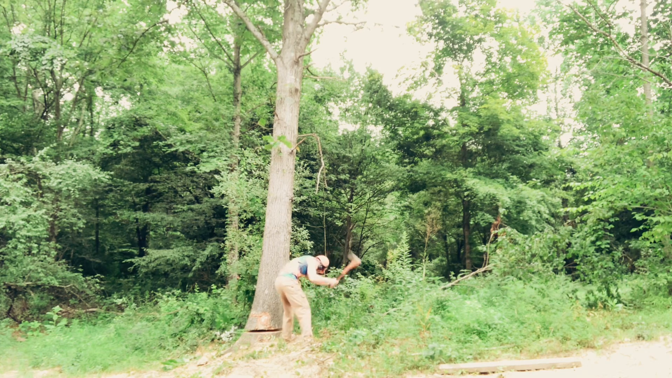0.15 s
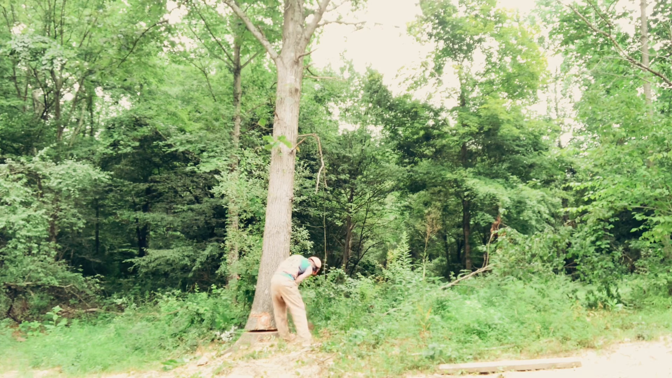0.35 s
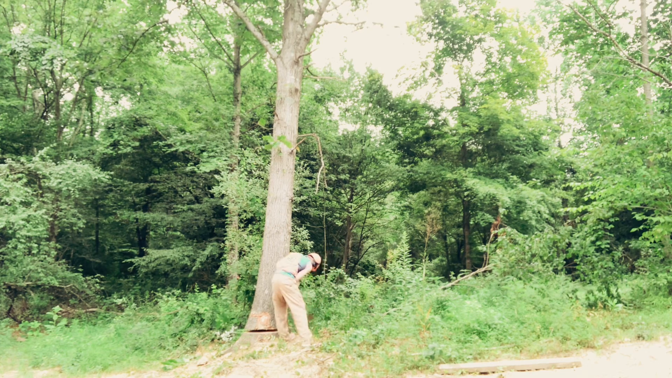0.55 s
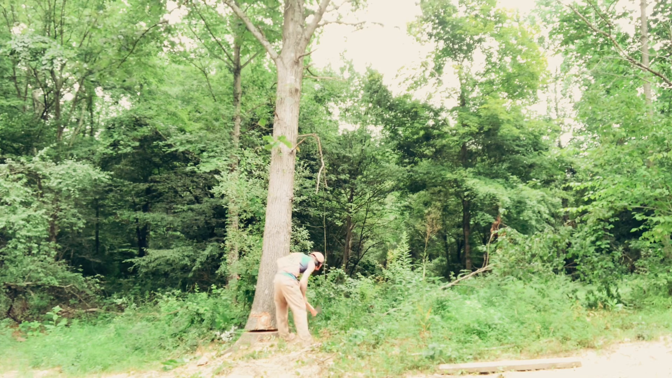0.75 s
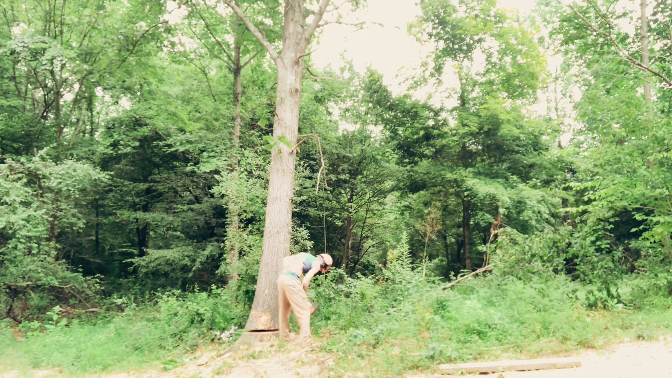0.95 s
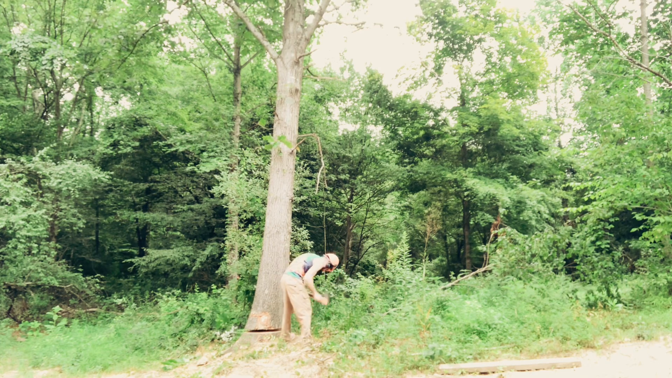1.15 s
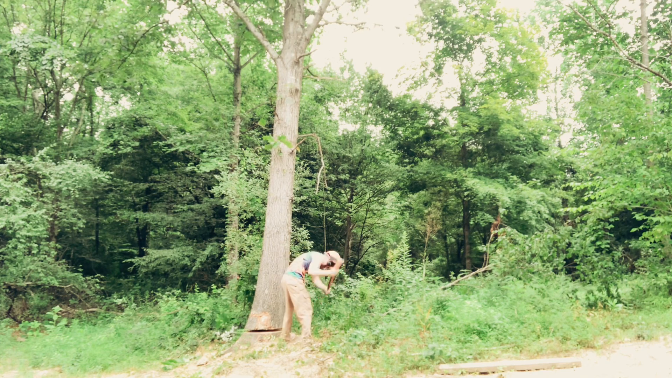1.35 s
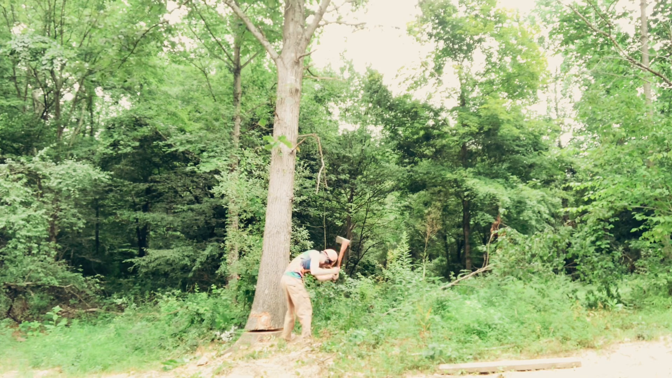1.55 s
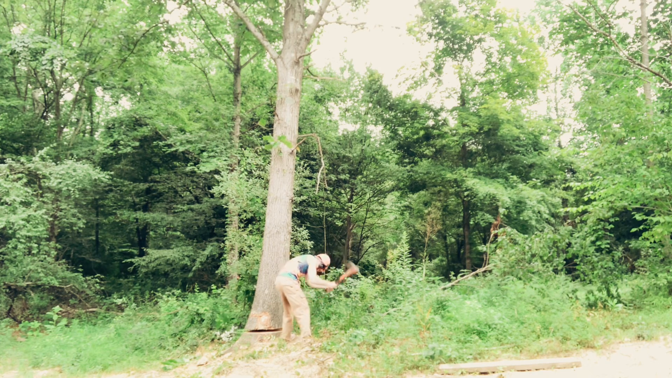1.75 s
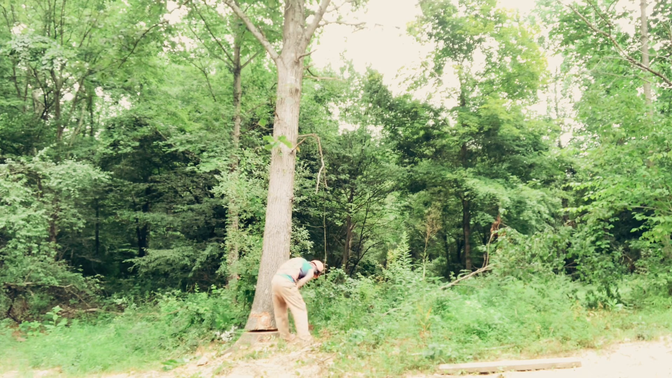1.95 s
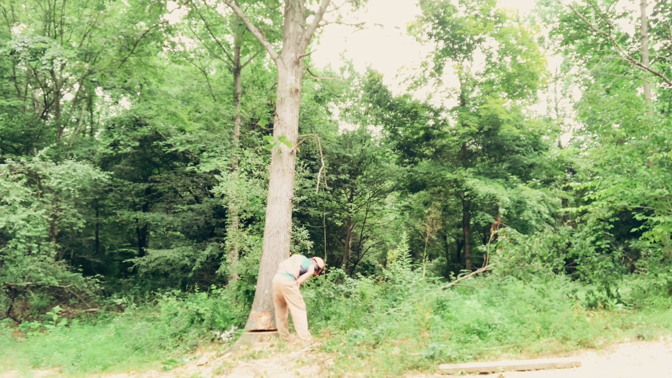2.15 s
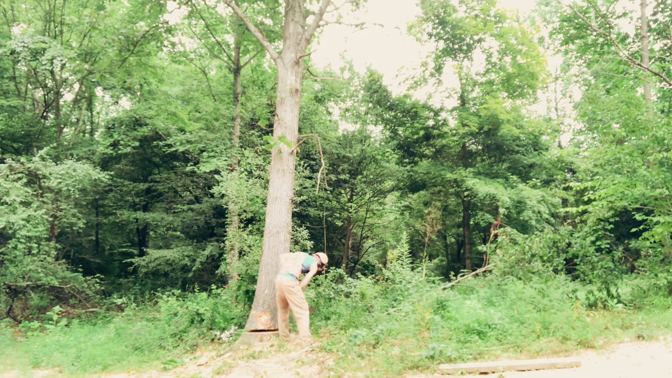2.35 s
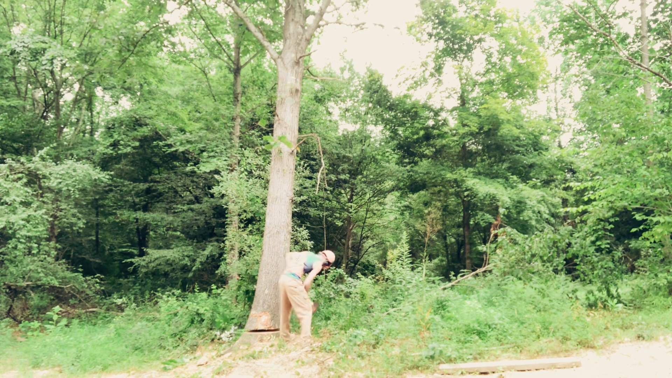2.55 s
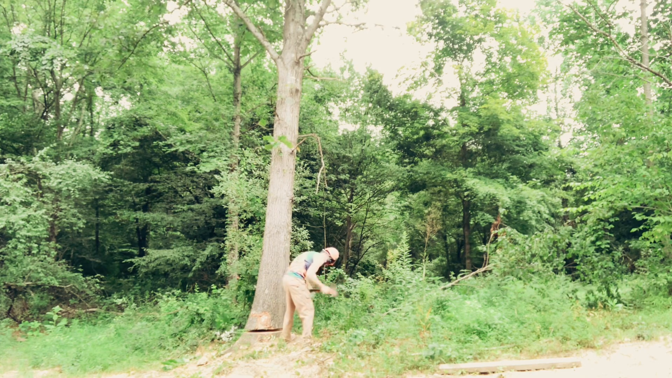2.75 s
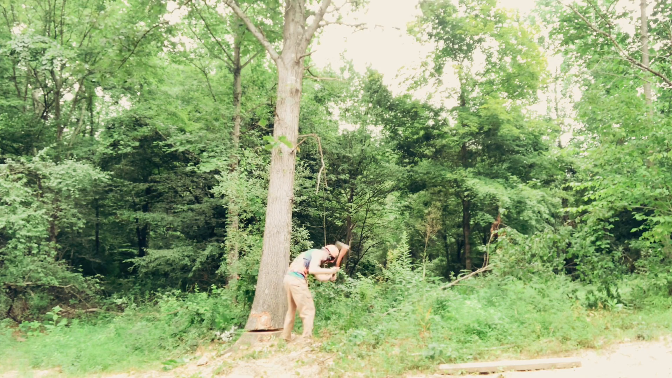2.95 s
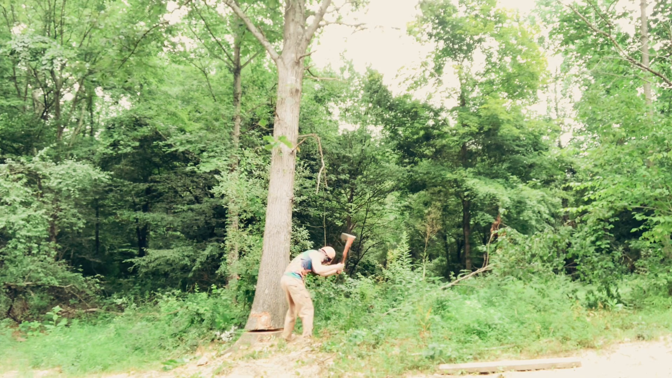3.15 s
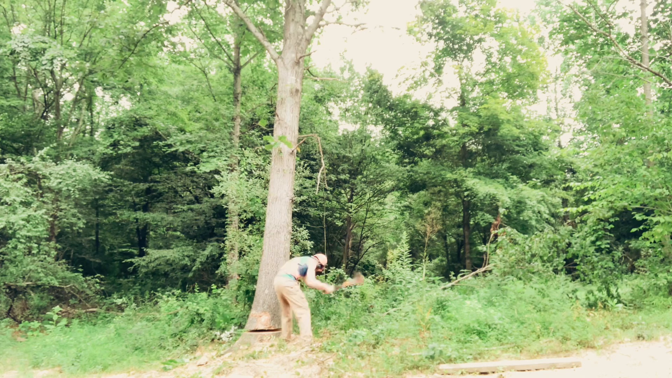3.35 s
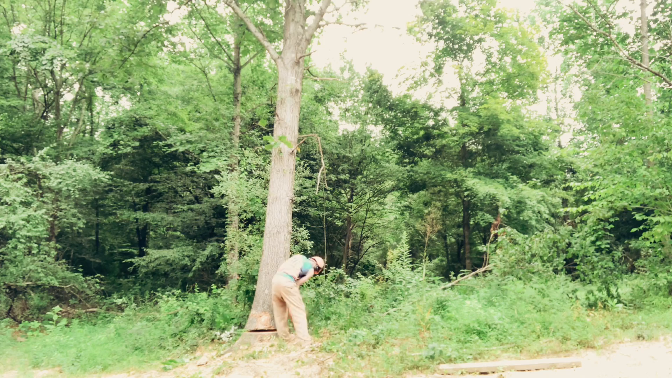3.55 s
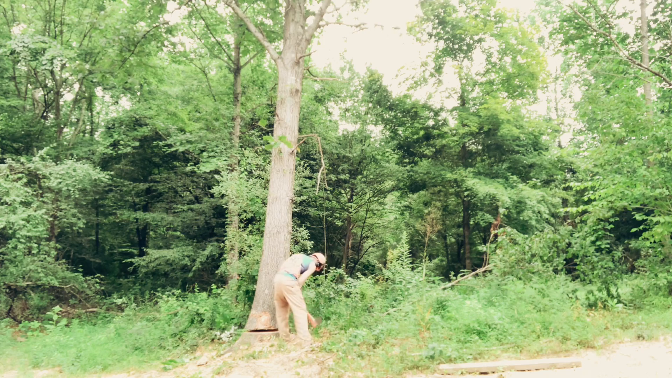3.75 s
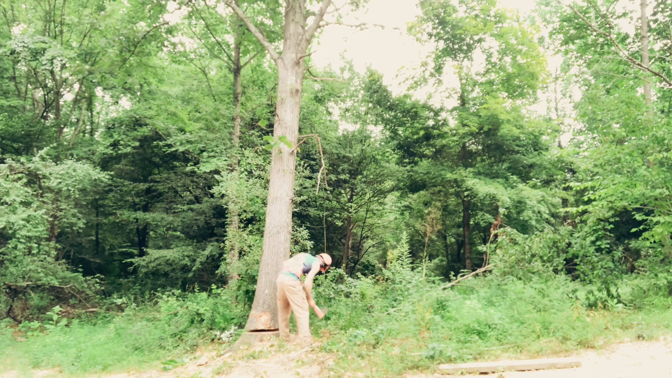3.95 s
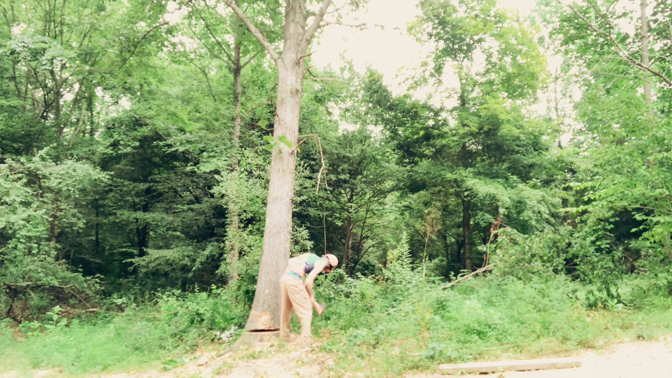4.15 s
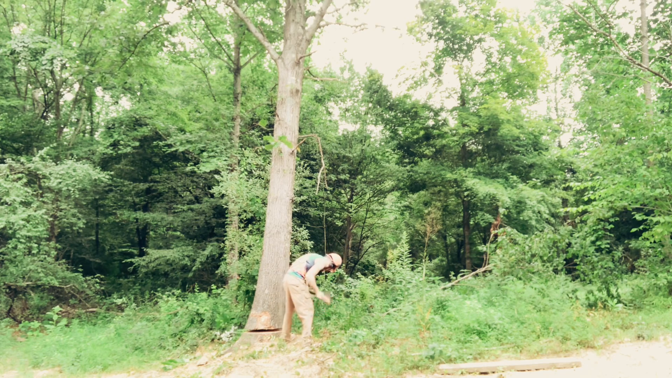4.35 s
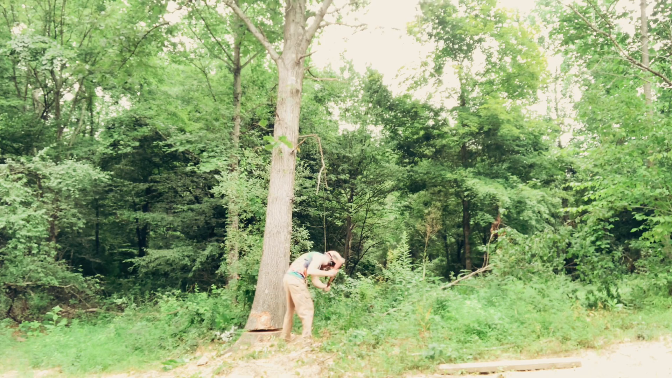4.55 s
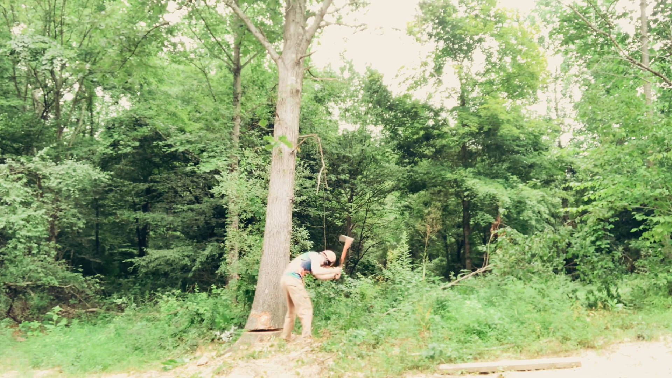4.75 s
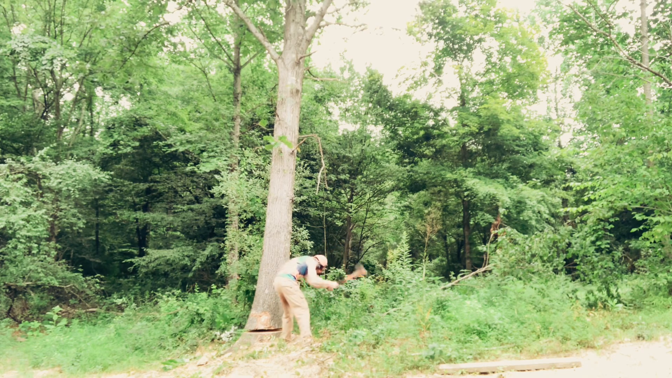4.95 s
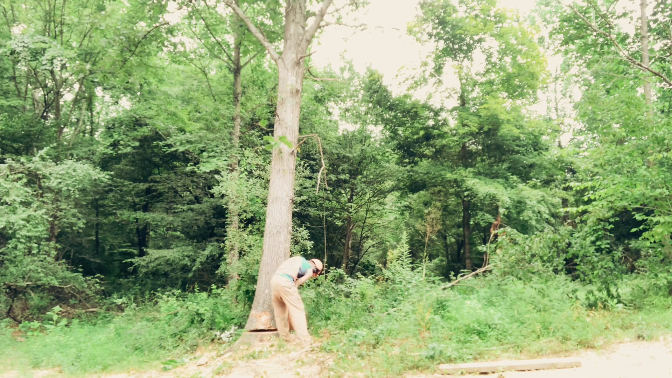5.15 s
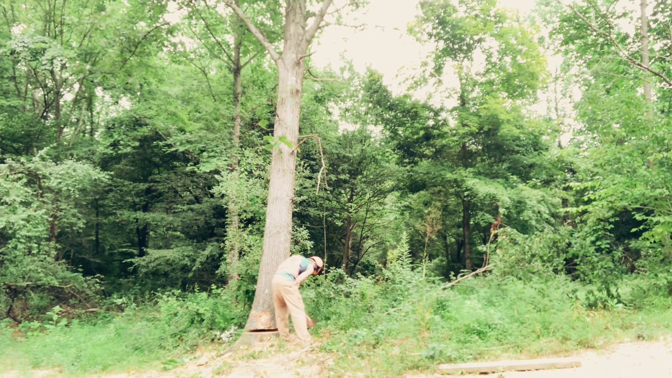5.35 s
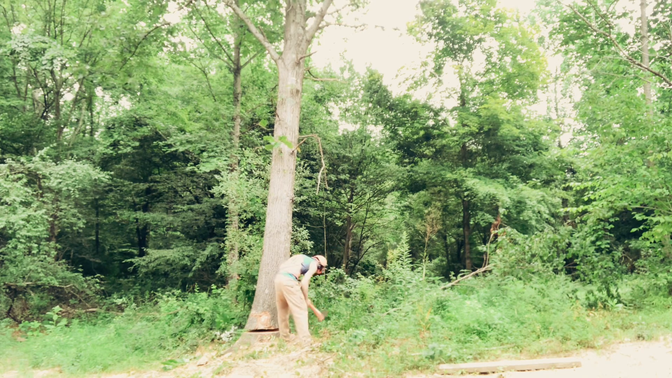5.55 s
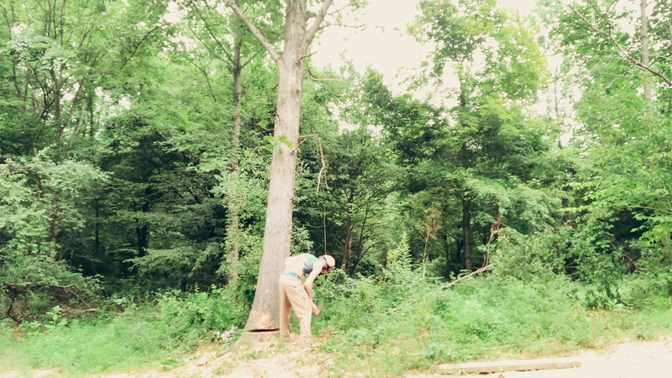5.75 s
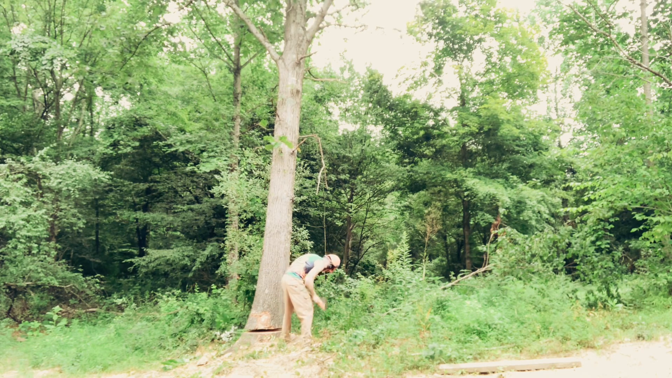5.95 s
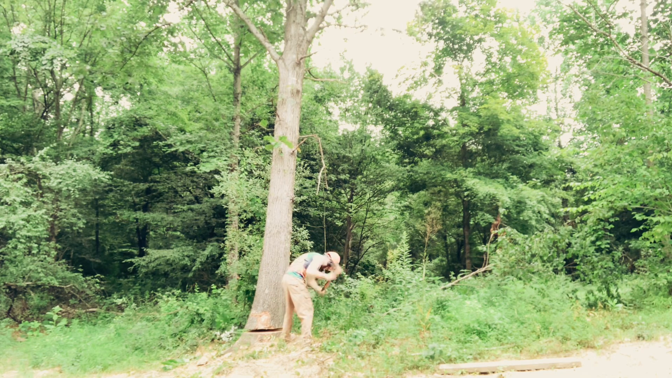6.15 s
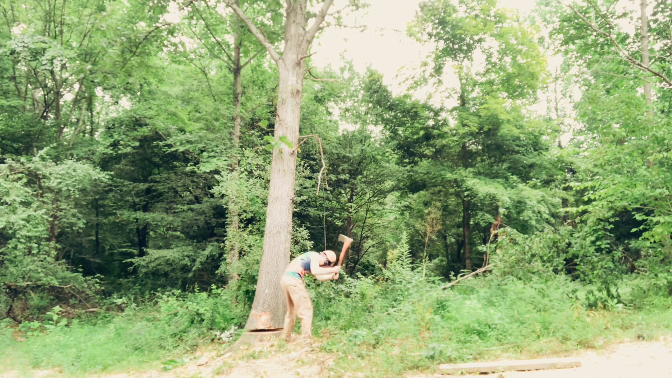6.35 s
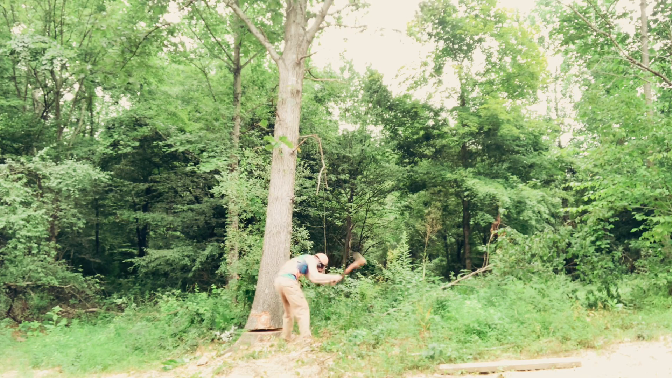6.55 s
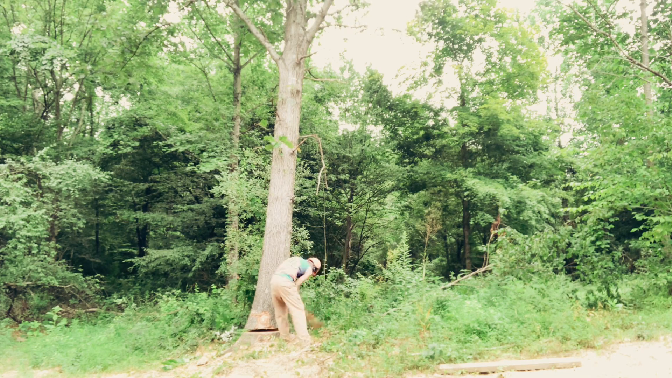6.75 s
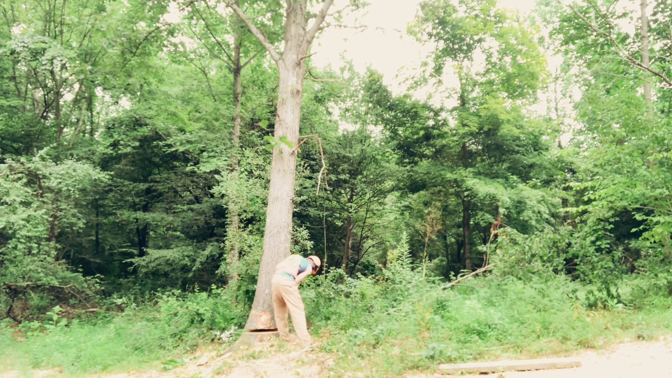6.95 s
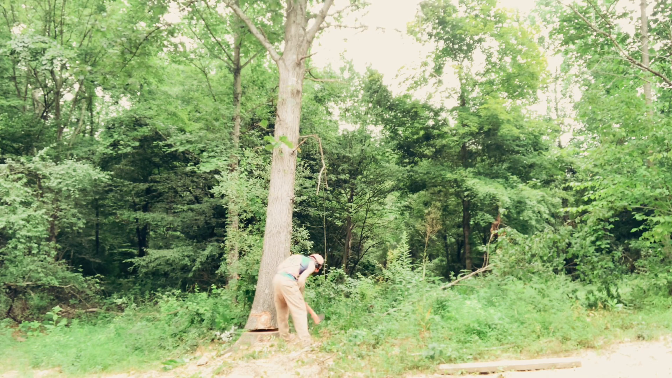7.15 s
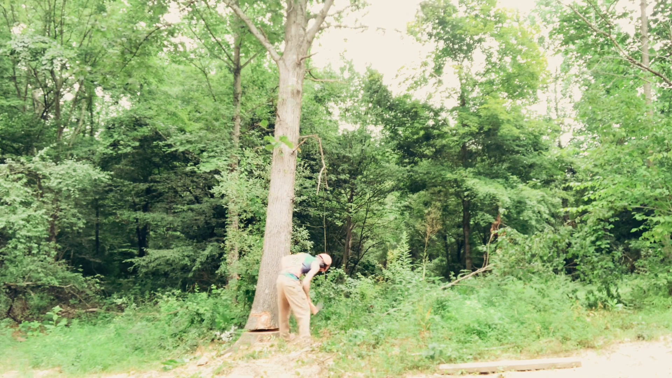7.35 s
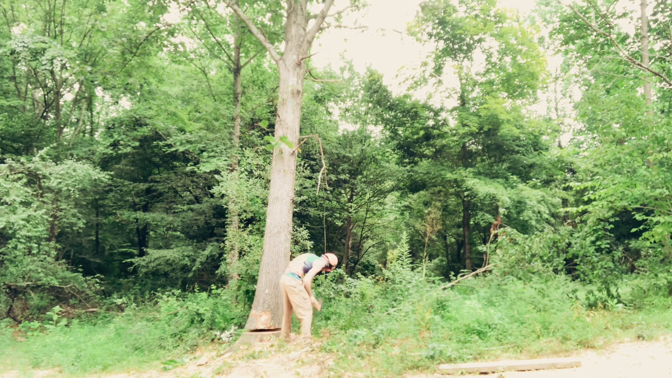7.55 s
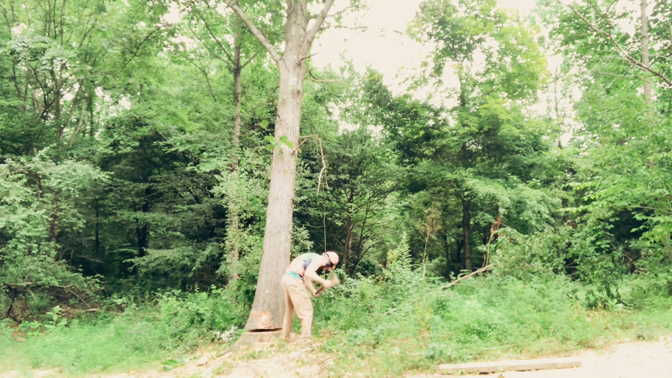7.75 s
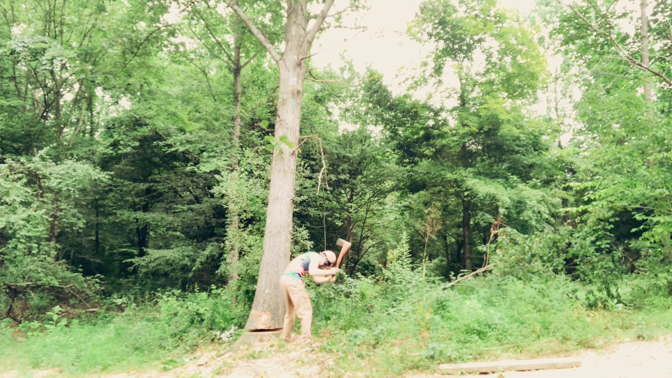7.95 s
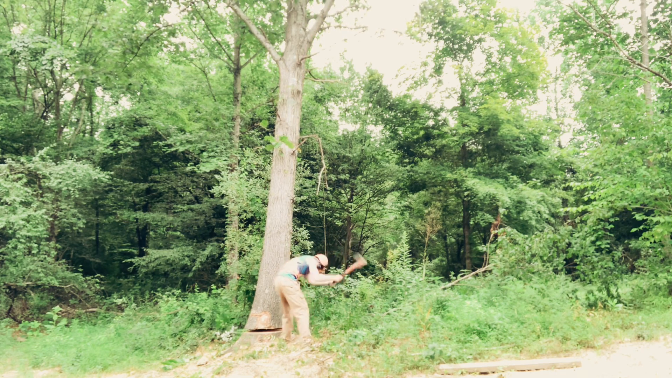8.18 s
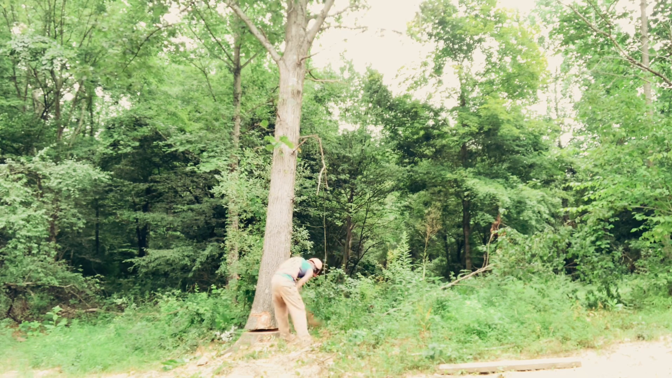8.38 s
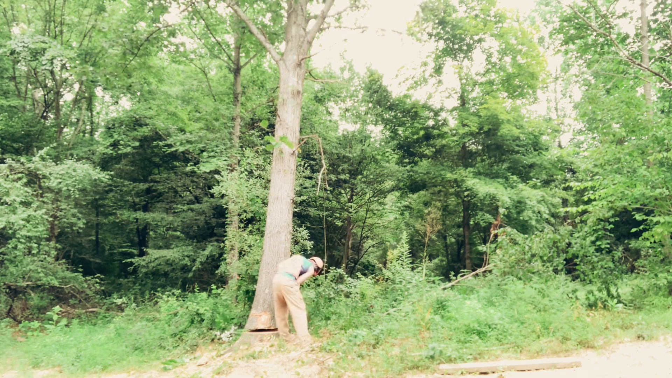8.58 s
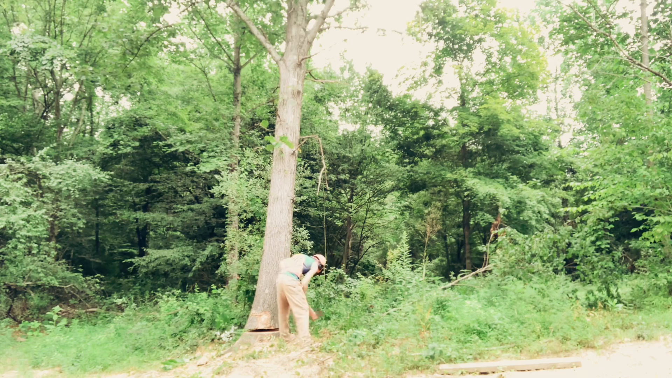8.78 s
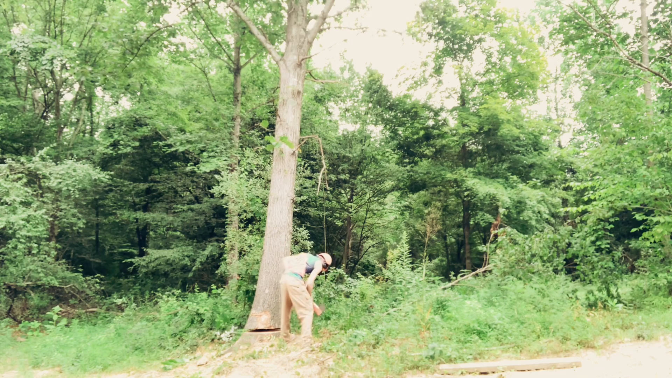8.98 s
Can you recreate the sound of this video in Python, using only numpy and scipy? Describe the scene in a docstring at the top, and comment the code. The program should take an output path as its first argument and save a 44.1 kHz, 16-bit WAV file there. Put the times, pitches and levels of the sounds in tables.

```python
"""Six axe blows, evenly spaced, drive wedges into the cut of a tall tree: each is a burst of noise with a
steel clink, a hollow knock of damped wood modes, and noise echoes that die away in the forest.
Before each blow the grip squeaks, as gliding tones blurred by noise, and the palm hisses on the handle.
Twigs snap and leaves rustle in shaped crackle, a far bird whistles in short sine glides,
and still air hisses over a wavering rumble."""
import sys
import numpy as np
from scipy import signal
from scipy.fft import rfft, irfft, next_fast_len
from scipy.io import wavfile
from scipy.ndimage import uniform_filter1d

SR = 44100
rng = np.random.default_rng(int(sys.argv[2]) if len(sys.argv) > 2 else 0)


def master_out(mix):
    """Clip the mix to full scale and print it as 16-bit PCM to the path in sys.argv[1]."""
    frames = np.transpose(np.atleast_2d(mix))
    ceiling = np.clip(frames, -1, 1)
    pcm = np.round(ceiling * 32767).astype(np.int16)
    wavfile.write(sys.argv[1], SR, pcm)


N = 397774

# Still air, leaves and distant rumble: (frequency [Hz], density [dB per Hz])
AIR_SPECTRUM = [(15, -108), (35, -93), (62, -77.5), (110, -88.5), (200, -91.5), (400, -99), (650, -103),
                (950, -103), (1600, -111), (3000, -119), (6000, -121), (9000, -121), (13000, -125),
                (16000, -140)]
# How alike diffuse sound is on the two sides: (frequency [Hz], likeness [0-1])
STEREO_LIKENESS = [(60, .96), (280, .72), (600, .2), (1100, .1), (2500, .2), (4200, .45), (6200, .4),
                   (8000, .92), (16000, .93)]
# Far bird: (time [s], length [s], level [dB], top pitch [Hz], glide to either side of the middle [share of pitch])
WHISTLES = [(4.977, 0.047, -83, 2370, -.08), (5.086, 0.05, -80, 2620, -0.028), (6.056, .12, -74, 2353, 0),
            (6.235, 0.082, -80, 2380, 0), (6.496, 0.099, -75.5, 2394, 0.0083), (6.63, 0.055, -83, 2326, 0),
            (8.173, 0.072, -75, 1456, -.02)]
# Colour of dry leaves and fibres before any tilt: (frequency [Hz], relative level [dB])
LEAF_SPECTRUM = [(100, -4), (400, 6), (1000, 9), (2000, 4.5), (4000, -0.5), (6000, -2), (9000, 1.5),
                 (13000, -7.5), (16000, -9)]
# Long rustle of leaves and bark after the fifth blow: (time [s], level before STIR_GAIN_DB [dB])
STIR_LEVELS = [(7.161, -67), (7.238, -67), (7.296, -62), (7.394, -71), (7.619, -62), (7.632, -65.5),
               (7.908, -70.5), (7.92, -71)]
# Dry snaps of twigs or wood fibres: (time [s], level [dB], t60 [s], tilt [dB per octave])
SNAPS = [(1.686, -64, 0.11, -1.5), (2.605, -48, 0.44, 3), (4.408, -53.5, 0.044, -1),
         (4.416, -59.5, 0.97, -1), (4.448, -60, 0.91, 0.5), (6.446, -64, 0.34, 0.5),
         (7.136, -53.5, 0.16, 1), (7.446, -63, .1, 7), (7.627, -50, 0.61, 1), (7.683, -55, .08, 2),
         (7.789, -51, 0.024, 0.5), (8.687, -46, 0.51, 0)]
# The hand slides along the handle: (time [s], level of the palm's hiss [dB])
SLIDES = [(.009, -100), (1.558, -65), (3.009, -61), (4.666, -70.5), (6.298, -64), (7.535, -72.5),
          (7.938, -64)]
# The grip sticks and slips on the handle: (time [s], length [s], level [dB], middle pitch [Hz],
# glide [share of pitch], arch [share of pitch], roughness [0-1])
SQUEAKS = [(-.02, .08, -74.5, 4230, 0, 0.02, 0.33), (1.524, 0.044, -63.5, 4350, -0.018, 0, 0.69),
           (1.538, 0.032, -64, 2960, .05, -0.016, 0.45), (1.55, 0.044, -58.5, 4370, .15, 0, 0.39),
           (1.571, 0.057, -59.5, 4330, 0.0027, 0, 0.53), (2.999, 0.026, -63, 3480, -.25, -0.023, 0.49),
           (3.004, 0.044, -53, 4500, -.24, -0.044, 0.23), (3.033, 0.028, -61, 3255, -.1, 0, .45),
           (4.633, 0.051, -56, 5660, -0.009, .14, 0.3), (4.664, .028, -57.5, 3570, -.05, -0.024, 0.63),
           (6.269, 0.045, -67.5, 4160, 0, 0.0045, 0.7), (6.296, 0.048, -56, 3950, -0.32, -.08, 0.71),
           (7.529, 0.042, -64, 3700, -.18, 0, 0.77), (7.925, 0.039, -58, 4270, -0.058, 0.017, .4),
           (7.943, .05, -58, 3690, -0.092, 0, .8)]
# Scatter from the ground and nearest trunks: (frequency [Hz], density [dB per Hz], t60 [s])
NEAR_ECHO = [(25, -68.5, 0.28), (50, -52.5, .2), (101, -50.5, .18), (150, -54.5, 0.27), (200, -53.5, 0.54),
             (320, -46, .3), (610, -51.5, 0.22), (900, -48, 0.33), (1310, -51.5, 0.5), (1550, -53.5, 0.38),
             (1910, -56, .22), (2340, -66, .2), (3000, -71.5, 0.16), (16100, -84, .19)]
# Echo of the forest: (frequency [Hz], density [dB per Hz], t60 [s])
FOREST_ECHO = [(25, -71, 0.73), (55.7, -59, 1.1), (100, -69.5, 1.2), (148, -64.5, 0.74), (193, -71, 1.7),
               (503, -72, 1.25), (710, -69.5, 1.3), (827, -60.5, 1.8), (1000, -65, 1.4), (1200, -64, 1.66),
               (1540, -65.5, 1.35), (2040, -63.5, 1.1), (2406, -59.5, 1.05), (2620, -65.5, .95),
               (3100, -68, .9), (6100, -71, .75), (8900, -69, .61), (12500, -76, 0.49), (16000, -86.5, .4)]
# Damped modes of wedge and trunk:
# (frequency [Hz], relative level [dB], t60 [s], left over right [dB], rise [s])
WOOD_MODES = [(66, -16.5, 0.11, -2, 0.0037), (95, -9, 0.035, -2, 0.005), (127, -15, 0.085, -2, 0.0033),
              (183, -23, 0.1, -1, 0.004), (212, -17, 0.068, -1, 0.003), (257, -31.2, 0.094, -1, 0.0038),
              (320, -24.8, 0.13, 0, 0.0022), (331, -7.0, 0.041, -1, 0.0055),
              (348, -26.4, 0.104, -1, 0.0021), (383, -28, 0.106, -1, 0.0032),
              (491, -21.1, 0.094, 1, 0.0012), (532, -23.4, 0.099, 2, 0.001),
              (567, -25.3, 0.063, -2, 0.0015), (593, -9.5, 0.028, 2, 0.0038),
              (630, -27.8, 0.095, 1, 0.0019), (689, -25.3, 0.134, 6, 0.0044),
              (772, -29.2, 0.307, 2, 0.0072), (811, -11.8, 0.057, 10, 0.0021),
              (841, -21.2, 0.116, 2, 0.0013), (942, -27.7, 0.273, -10, 0.0026),
              (977, -17.4, 0.156, -5, 0.006), (991, -7.3, 0.059, 8, 0.0077), (1024, -14.9, 0.077, 2, 0.001),
              (1064, -25.1, 0.118, 2, 0.0013), (1126, 7.6, 0.011, 6, 0.0016),
              (1127, -36.4, 0.43, -1, 0.0014), (1211, -19.0, 0.087, 4, 0.0016),
              (1251, -26.3, 0.354, 3, 0.0085), (1326, -24.8, 0.258, -1, 0.0174),
              (1399, -19.5, 0.045, 4, 0.0008), (1535, -21.5, 0.064, 1, 0.0005),
              (1635, -32.7, 0.102, 1, 0.0011), (1725, -29.5, 0.065, 1, 0.0013),
              (1930, -12.1, 0.009, 1, 0.0001), (2458, -38.4, 0.26, 0, 0.0021)]
# Bands that a hollow blow lifts or loses: (centre [Hz], half width [Hz], share of the hollowness)
HOLLOW_BANDS = [(670, 130, 1), (900, 110, -0.26), (1380, 90, .7), (2200, 300, -.4)]
# Noise of steel on the wedge: (frequency [Hz], density before the blow's gain [dB per Hz])
CRACK_SPECTRUM = [(200, -69.5), (900, -46.5), (1800, -45), (2700, -49.5), (4400, -52.5), (5500, -52.5),
                  (7000, -59.5), (10000, -46), (12000, -51.5), (15000, -53), (16500, -64)]
# Clink of the axe head: (frequency [Hz], level before the blow's gain [dB], t60 [s])
STEEL_MODES = [(3290, -26, 0.0077), (5680, -14, 0.019), (8200, -19, 0.018), (9930, -16.5, 0.017),
               (12370, -22, 0.011)]
# Each blow lands a little differently: (time [s], gain of knock and echo [dB], gain of crack [dB],
# hollowness [dB], treble of the echo [dB], ring of the axe head in the trees [dB])
BLOWS = [(0.4407, 0.5, 1.5, -1.5, -1.5, -47), (2.0431, -1, -4.5, 2, -5.5, -42.5),
         (3.584, .5, 0, -2, -2.5, -35), (5.1842, .5, 0, -1, -1, -46), (6.826, 1, -5.5, -4.5, -4.5, -63.5),
         (8.4585, -2.5, -8.5, 5.5, -8.5, -68)]

RIGHT_LEAD_S = .000245  # treble reaches the right side this much sooner
RUMBLE_HZ, RUMBLE_DEPTH_DB, RUMBLE_RATE = 150, 2.5, 12  # upper edge, depth, changes per second
TICKS_PER_S, TICK_DB, TICK_S = 45, -1.5, .0012  # single dry fibres within a rustle: rate, level, decay
STIR_GAIN_DB, STIR_TILT, STIR_RISE_S, STIR_T60 = 5.5, -0.34, 0.035, 1  # tilt in dB per octave
SNAP_RISE_S = 0.0017
# Palm and lift tilts are in dB per octave; the lift comes LIFT_LEAD_S before the slide
PALM_RISE_S, PALM_T60, PALM_TILT = 0.01, .42, 1.5
LIFT_LEAD_S, LIFT_DB, LIFT_RISE_S, LIFT_T60, LIFT_TILT = 0.34, -66.5, .1, 0.62, -2.4
SLIP_JITTER = .115  # fast pitch scatter at full roughness, share of the pitch
RUB_DB, RUB_WIDTH_HZ = 0, 1600  # rubbing noise against the tone at full roughness, half width
SQUEAK_T60 = .56  # echo of a squeak, seconds
NEAR_DELAY_S = .006  # first scatter after the blow
BELT_S, BELT_SPREAD_S, BELT_DB = 0.054, 0.014, 2  # swell of echo from the nearest belt of trees
RING_T60 = .6  # ring of the steel among the trees, seconds
KNOCK_DELAY_S, KNOCK_LEAD_S = .0005, .00009  # wood after the crack; head start of the left side
CONTACT_S, CRACK_RISE_S = .0007, .00015  # steel bearing on the wedge; rise of the crack
EDGE_HZ = 16500  # upper band limit


def amp(db):
    """Turns decibels into gain."""
    return 10 ** (np.asarray(db) / 20)


def read(table, hz, axis=1):
    """Reads one column of a table, joined on a log-frequency axis."""
    columns = np.transpose(table)
    return np.interp(np.log(hz + 1), np.log(columns[0] + 1), columns[axis])


def evened(x):
    """Scales to rms 1."""
    return x / np.sqrt(np.mean(x ** 2) + 1e-20)


def add(mix, s, sound):
    """Mixes a stereo sound in at time s, trimming what falls outside."""
    start = round(s * SR)
    sound = sound[:, max(-start, 0):]
    part = mix[:, max(start, 0):][:, :sound.shape[1]]
    part += sound[:, :part.shape[1]]


def colour(x, gain_db):
    """Filters by a function that gives dB for each frequency."""
    size = next_fast_len(x.shape[-1] + 2048)
    gain = amp(gain_db(np.fft.rfftfreq(size, 1 / SR)))
    return irfft(rfft(x, size) * gain, size)[..., :x.shape[-1]]


def wander(size, rate):
    """Smooth random curve of rms 1 that takes a new turn rate times a second."""
    knots = rng.standard_normal(4096)
    return evened(np.interp(np.arange(size) * rate / SR, np.arange(len(knots)), knots))


def noise(spectrum, size, direct=False):
    """Stereo noise of a given density; its treble reaches the right side first."""
    hz = np.fft.rfftfreq(size, 1 / SR)
    left, other = rfft(rng.standard_normal((2, size)))
    same = 1 if direct else read(STEREO_LIKENESS, hz)
    right = same * left + np.sqrt(1 - same ** 2) * other
    right = right * np.exp(2j * np.pi * hz * RIGHT_LEAD_S * (hz > 1600))
    return irfft(np.array([left, right]) * amp(read(spectrum, hz)), size) * np.sqrt(SR / 2)


def trees(sound, wet_db, t60):
    """Adds the scatter of the trunks to a small sound, as a decaying random set of paths."""
    t = np.arange(SR // 2) / SR
    paths = rng.standard_normal((2, len(t))) * amp(-60 * t / t60)
    paths *= amp(wet_db) / np.linalg.norm(paths[0])
    paths[:, 0] += 1  # the direct path
    return signal.fftconvolve(sound, paths, axes=1)


def crackle(size, tilt, grain_db=0.83, clump_db=1.1, pivot_hz=4000):
    """Fine dry crackle of rms 1: uneven leaf noise with scattered fibre ticks, tilted in dB per octave."""
    spectrum = [(hz, level + tilt * np.log2(hz / pivot_hz)) for hz, level in LEAF_SPECTRUM]
    breaks = (rng.random(size) < TICKS_PER_S / SR) * rng.exponential(1, size)
    ticks = amp(TICK_DB) * signal.lfilter([1], [1, -np.exp(-1 / (TICK_S * SR))], breaks)
    unevenness = amp(grain_db * wander(size, 840) + clump_db * wander(size, 54))
    return evened(noise(spectrum, size=size) * (1 + ticks) * unevenness)


def burst(rise, t60, tilt):
    """One second of crackle that rises and dies away."""
    t = np.arange(SR) / SR
    fade = amp(-60 * np.maximum(t - rise, 0) / t60)
    return crackle(SR, tilt) * np.minimum(t / rise, 1) * fade


def air():
    """A thin noise hiss that barely swells, over a wavering rumble."""
    swell = amp(.4 * wander(N, 2))
    still = noise(AIR_SPECTRUM, size=next_fast_len(N))[:, :N]
    rumble = colour(still, lambda hz: -20 * np.log10(1 + (hz / RUMBLE_HZ) ** 4))
    return (still - rumble) * swell + rumble * amp(RUMBLE_DEPTH_DB * wander(N, RUMBLE_RATE))


def bird(arch=0.08, waver=.008):
    """Faint sine whistles, arched, gliding and slightly wavering, from deep in the wood."""
    out = np.zeros((2, N))
    for s, length, db, top_hz, glide in WHISTLES:
        u = np.linspace(-1, 1, int(length * SR))
        pitch = top_hz * (1 - arch * u ** 2 + glide * u + waver * wander(len(u), 400))
        turn = 2 * np.pi * np.cumsum(pitch) / SR
        sides = np.array([np.sin(turn), np.cos(turn)])  # a quarter cycle apart for width
        whistle = amp(db) * evened(sides * (1 - u ** 2))
        add(out, s, trees(whistle, wet_db=-7.5, t60=.35))
    return out


def stir():
    """Leaves and bark keep rustling for a while: crackle that swells and sinks, then dies away."""
    out = np.zeros((2, N))
    times, db = np.transpose(STIR_LEVELS)
    t = np.arange(times[0], times[-1] + STIR_T60, 1 / SR)
    dying_db = -60 * np.maximum(t - times[-1], 0) / STIR_T60
    level_db = STIR_GAIN_DB + np.interp(t, times, db) + dying_db
    fade_in = np.minimum((t - times[0]) / STIR_RISE_S, 1)
    add(out, times[0], fade_in * amp(level_db) * crackle(len(t), STIR_TILT))
    return out


def snaps():
    """Small sharp breaks of twigs or fibres, each a sudden crackle with a decaying tail."""
    out = np.zeros((2, N))
    for s, db, t60, tilt in SNAPS:
        add(out, s, amp(db) * burst(SNAP_RISE_S, t60, tilt))
    return out


def squeak(length, hz, glide, arch, rough, octave_db=-7, wobble=0.08, grain_db=3):
    """Stick and slip of the grip: a gliding tone and its octave, blurring into a rub when slips are uneven."""
    size = int(length * SR)
    u = np.linspace(-1, 1, size)
    scatter = SLIP_JITTER * wander(size, 2300) + wobble * wander(size, 250)
    pitch = hz * (1 + glide * u / 2 - arch * u ** 2) * (1 + rough * scatter)
    turn = 2 * np.pi * (np.cumsum(pitch) / SR + np.array([[0], [RIGHT_LEAD_S]]) * pitch)
    tone = evened(np.sin(turn) + amp(octave_db) * np.sin(2 * turn))
    flat = noise([(hz, 0)], size=size)
    rub = evened(colour(flat, lambda f: -40 * np.log10(1 + ((f - pitch.mean()) / RUB_WIDTH_HZ) ** 2)))
    grain = amp(grain_db * rough * wander(size, 400))
    sound = (tone + rough * amp(RUB_DB) * rub) * np.hanning(size) * grain
    return trees(evened(sound), wet_db=-7.5, t60=SQUEAK_T60)


def swings():
    """A soft rustle as the axe is lifted, then the palm's crackling hiss and quick stick-slip squeaks."""
    out = np.zeros((2, N))
    for s, db in SLIDES:
        add(out, s - LIFT_LEAD_S, amp(LIFT_DB) * burst(LIFT_RISE_S, LIFT_T60, LIFT_TILT))
        add(out, s, amp(db) * burst(PALM_RISE_S, PALM_T60, PALM_TILT))
    for s, length, db, hz, glide, arch, rough in SQUEAKS:
        add(out, s, amp(db) * squeak(length, hz, glide, arch, rough))
    return out


def echo(table, size, delay, rise, lumpy_db, pan_db, patchy_db=1.8):
    """Countless reflections, as noise that builds up, comes in clumps and dies at each band's own speed."""
    hz, t, z = signal.stft(noise(table, size), SR, nperseg=256)
    patches = rng.standard_normal((len(t), len(hz)))
    patches = uniform_filter1d(patches, size=7, axis=0)
    patches = evened(uniform_filter1d(patches, size=3, axis=1)).T
    patches_db = patchy_db * patches * (hz / (hz + 500))[:, None]  # gentler in the bass
    fade = amp(patches_db - 60 * t / read(table, hz, axis=2)[:, None])
    tail = signal.istft(z * fade, SR, nperseg=256)[1][:, :size]
    age = np.maximum(np.arange(size) / SR - delay, 0)
    pan = amp([[pan_db / 2], [-pan_db / 2]])
    return tail * (1 - np.exp(-age / rise)) * amp(lumpy_db * wander(size, 140)) * pan


def axe_head(hz=8150, width=260):
    """The thin ring of the steel drawn out by the trees: a decaying narrow band of noise."""
    t = np.arange(SR) / SR
    band = colour(noise([(hz, 0)], size=SR), lambda f: -20 * np.log10(1 + ((f - hz) / width) ** 2))
    return evened(band) * amp(-60 * t / RING_T60)


def knock(lag_cycles=.8):
    """Damped sine modes of wedge and trunk; slow bending waves make the low ones speak later."""
    t = np.arange(2 * SR) / SR
    out = np.zeros((2, 2 * SR))
    side_lead = np.array([[KNOCK_LEAD_S], [0]])
    for hz, db, t60, pan_db, rise in WOOD_MODES:
        age = np.maximum(t - KNOCK_DELAY_S - lag_cycles / hz + side_lead, 0)
        level = amp(db - 60 * age / t60 + np.array([[pan_db], [-pan_db]]) / 2)
        out -= np.sin(2 * np.pi * hz * age) * (1 - np.exp(-age / rise)) * level
    return out


def crack(splinter_db=-15, t60=0.065):
    """A noise burst as the wedge slips in the kerf, a brief splintering, and the axe head's sine clink."""
    t = np.arange(4096) / SR
    contact = np.exp(-(t / CONTACT_S) ** 4)
    splinter = amp(splinter_db - 60 * t / t60) * (1 - np.exp(-t / CONTACT_S))
    age = np.maximum(t - np.array([[RIGHT_LEAD_S], [0]]), 0)
    clink = sum(amp(db - 60 * age / ring) * np.sin(2 * np.pi * hz * age) for hz, db, ring in STEEL_MODES)
    hit = noise(CRACK_SPECTRUM, size=4096, direct=True) * (contact + splinter)
    return (hit + clink) * (1 - np.exp(-t / CRACK_RISE_S))


def hollow_shape(hz):
    """Resonance-shaped bands through which the hollowness of a blow acts."""
    return sum(share / (1 + ((hz - centre) / width) ** 2) for centre, width, share in HOLLOW_BANDS)


def blows(shifting=0.44, treble_hz=2200):
    """Crack, ring, knock and echo of each blow; the wood and near scatter repeat, the far echo partly shifts."""
    out = np.zeros((2, N))
    size = 2 * SR
    wood = knock()
    near = echo(NEAR_ECHO, size, delay=NEAR_DELAY_S, rise=0.00074, lumpy_db=0.5, pan_db=0.0)
    belt = amp(BELT_DB * np.exp(-((np.arange(size) / SR - BELT_S) / BELT_SPREAD_S) ** 2))

    def far_echo():
        """Forest echo with the swell from the nearest belt of trees."""
        return belt * echo(FOREST_ECHO, size, delay=0.0011, rise=.004, lumpy_db=0.0, pan_db=0.76)

    forest = far_echo()
    for s, knock_db, crack_db, hollow_db, treble_db, ring_db in BLOWS:
        # part of the echo shifts with the leaves
        far = np.sqrt(1 - shifting) * forest + np.sqrt(shifting) * far_echo()
        scatter = colour(near + far, lambda hz: treble_db * hz ** 6 / (hz ** 6 + treble_hz ** 6))
        body = colour(wood + scatter, lambda hz: knock_db + hollow_db * hollow_shape(hz))
        add(out, s, amp(crack_db) * crack())
        add(out, s, amp(ring_db) * axe_head())
        add(out, s, body)
    return out


def scene():
    """The felling site, all layers summed."""
    return air() + bird() + stir() + snaps() + swings() + blows()


def record(dry, ceiling=0.92, rumble_hz=32):
    """A low cut, the loudest peaks rounded off, then the band limit."""
    dry = signal.sosfilt(signal.butter(5, rumble_hz, "highpass", fs=SR, output="sos"), dry)
    rounded = dry / (1 + (dry / ceiling) ** 4) ** (1 / 4)
    band_limit = signal.firwin(255, EDGE_HZ, window=("kaiser", 9), fs=SR)
    return signal.oaconvolve(rounded, band_limit[None], "same", axes=1)


dry = scene()
out = record(dry)
master_out(out)
```